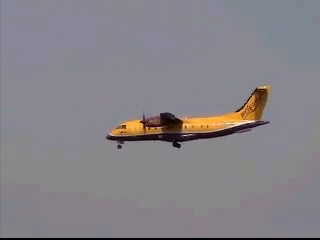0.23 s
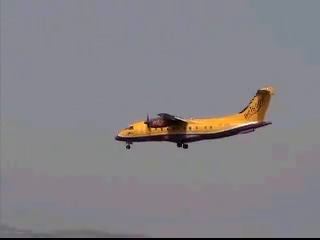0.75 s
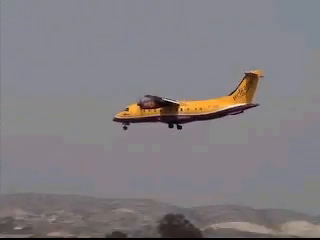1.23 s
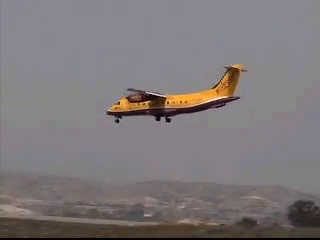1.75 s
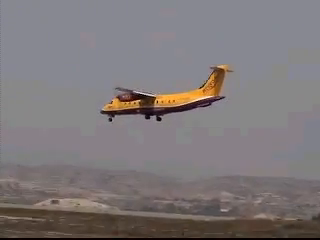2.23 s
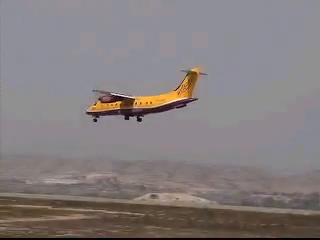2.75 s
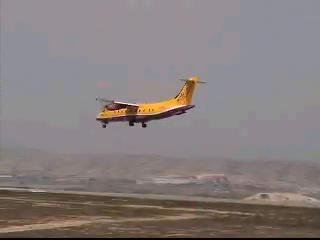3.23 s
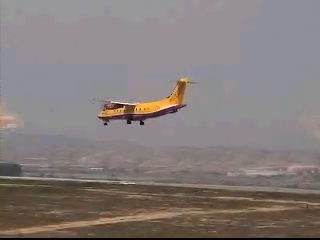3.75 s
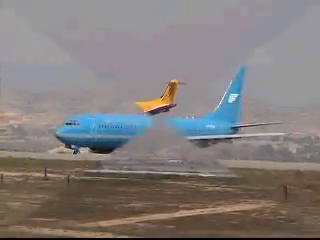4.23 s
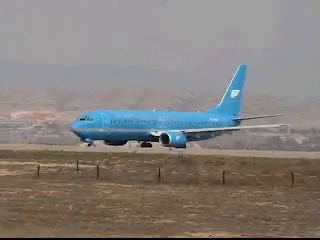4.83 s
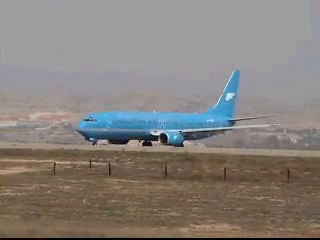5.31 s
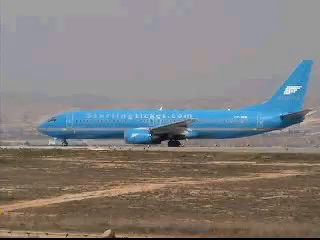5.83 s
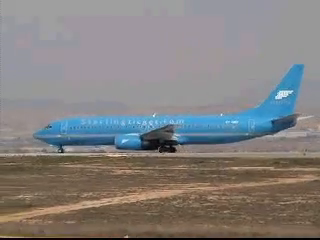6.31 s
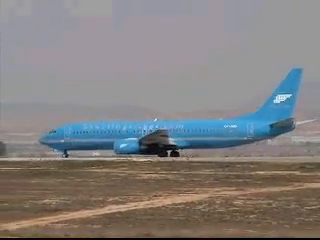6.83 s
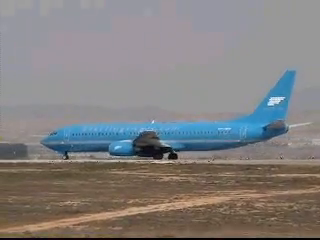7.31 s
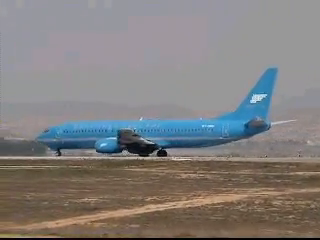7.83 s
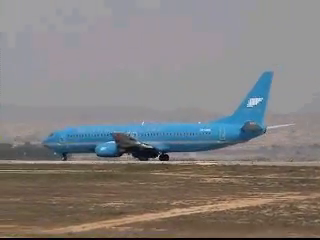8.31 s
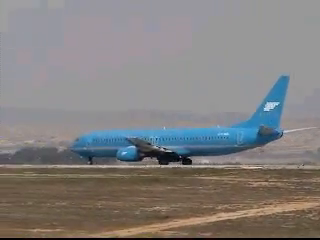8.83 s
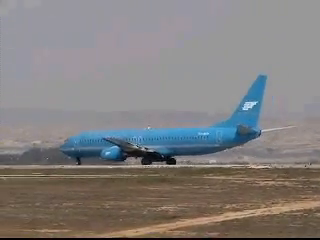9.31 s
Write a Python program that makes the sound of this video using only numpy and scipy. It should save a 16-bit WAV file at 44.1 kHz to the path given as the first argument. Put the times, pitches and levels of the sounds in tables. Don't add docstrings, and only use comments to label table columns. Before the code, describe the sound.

A twin propeller plane drones past on approach with throbbing low hum and hiss, then a distant jet roars steadily while wind gusts thump the microphone.

```python
import sys
import numpy as np
from scipy import signal
from scipy.fft import rfft, irfft, next_fast_len
from scipy.io import wavfile
from scipy.ndimage import uniform_filter1d, map_coordinates

SR = 44100
rng = np.random.default_rng(int(sys.argv[2]) if len(sys.argv) > 2 else 0)


def voltage_ratio(level):
    return 10 ** (np.asarray(level, float) / 20)


def dump(signal):
    limited = np.clip(np.atleast_2d(signal).T, -1, 1)
    pcm = np.round(limited * 32767).astype(np.int16)
    wavfile.write(sys.argv[1], SR, pcm)


N = 422037
T = np.arange(N) / SR
HOP = 256

# centre_s, lift_db, half_length_s
GUSTS = [
    (4.55, 6, 0.081),
    (5.05, -5, 0.086),
    (5.57, 7.5, 0.063),
    (6.0, 13.5, 0.17),
    (6.33, 8, 0.15),
    (7.05, 3, 0.16),
    (8.2, 6, 0.54),
    (9.0, 3, .15),
]
# frequency_hz, density_db
BUFFET_SPECTRUM = [(20, -27), (50, -1.5), (110, -5), (200, -6.5), (400, -31), (800, -42.5)]
# centre_s, peak_db, pitch_hz
THUMPS = [(4.438, -37, 180.6), (4.461, -31, 122), (4.516, -21, 145), (4.659, -18.5, 142), (5.567, -21, 95),
          (5.87, -26, 141), (5.924, -14, 88), (5.979, -18, 156), (6.027, -10, 120), (6.082, -18, 124),
          (6.136, -26, 103), (6.164, -18, 107), (6.194, -16, 97), (6.285, -15.5, 94), (6.34, -16, 81.4),
          (6.398, -13, 146), (7.877, -20, 147), (7.936, -16, 117), (8.318, -13.5, 142), (8.482, -18, 111),
          (8.804, -20, 127), (8.89, -21, 130)]
# centre_s, peak_db, pitch_hz
KNOCK = (6.172, -16, 360)

# frequency_hz, density_db
JET_SPECTRUM = [(15, -44), (25, -20), (102, 5), (130, -17.5), (172, 0.5), (209, -5.5), (309, -1.5),
                (447, -9), (487, -9.5), (838, -4.5), (1350, -15), (2080, -15.5), (2430, -12.5),
                (2880, -16.5), (4450, -19), (5780, -50), (9790, -120)]
JET_PARTS_HZ = (666, 2740)
# multiple, width_hz, level_db
FAN_SKIRTS = [
    (1, 51, -46.5),
    (2, 110, -47),
    (3, 200, -50.5),
    (4, 120, -51),
]
# pitch_hz, level_db
SHAFT_LINES = [(190, -56), (1720, -61), (2090, -64), (2728, -63), (3138, -64), (3565, -64)]
# centre_s, lift_db, half_length_s
FAN_SWELLS = [
    [(5.3, 2, 0.25), (6.3, 7.5, 0.44), (7.0, 7, .15), (7.35, 9.5, .12), (7.95, -1, .12), (8.5, 4, 0.21)],
    [(5.1, 5, 0.22), (5.8, 14, 0.11), (6.3, 12.5, 0.17), (6.65, 8.5, 0.096), (6.92, 10, 0.11), (9.0, 4, 0.18)],
    [(5.3, 0, .2), (7.2, 16, 0.17), (8.6, 13, 0.18)],
]
# start_s, end_s
JET_FADE_S = (3.9, 4.7)

# time_s, engine_level_db, abeam_ratio (how far the propeller side faces the listener)
APPROACH = [(0, -20, 0.45), (.5, -22.5, 0.15), (.85, -19.5, 0.3), (1.2, -16, 0), (1.55, -17.5, -.1),
            (1.85, -22.5, .8), (2.35, -20.5, 0.75), (2.62, -23.5, 0.93), (2.8, -20.5, 0.6),
            (3.05, -20.5, .7), (3.3, -20.5, .8), (3.5, -18.5, 0.1), (3.75, -21.5, 0.86), (4.0, -23.5, -.1),
            (4.3, -24.5, 0.2), (4.46, -28, .2), (4.62, -40, 0.57), (5.0, -41, 0.4)]
APPROACH_PARTS_HZ = (75, 300, 530, 850, 2400)
# frequency_hz, density_db
WASH_SPECTRUM = [(15, -62), (25, -54), (66, -6), (102, 0.5), (131, -4), (146, -2), (172, -11), (260, 0),
                 (508, -9.5), (671, -5.5), (962, -1.5), (1170, -15.5), (1250, -14.5), (1620, -31),
                 (2750, -120)]
# frequency_hz, density_db
HISS_SPECTRUM = [(740, -36), (1250, -6), (1560, 0.5), (2050, -7), (2430, 3.5), (2700, -2.5), (2970, 5),
                 (3340, -2), (3730, 1.5), (4450, -1), (5780, -36), (9790, -120)]
# time_s, pitch_hz
BLADE_PITCH = [(0, 142), (1, 140.3), (2, 138), (3, 131), (3.6, 126.5), (4.2, 125), (5, 118.8)]
# time_s, level_db
DRONE = [(0, -34), (.4, -33), (1.3, -23), (1.6, -30.5), (1.9, -20), (2.6, -21.5), (2.92, -26.5),
         (3.25, -20.5), (3.47, -31), (3.62, -20), (3.9, -27.5), (4.5, -31), (5, -51)]
# time_s, beat_hz
BEAT = [(0, 4.7), (1.7, 5.0), (2.2, 5.7), (5, 6.05)]
# centre_s, lift_db, half_length_s
OVERTONES = [
    (.73, 16, .06),
    (1.35, 11.5, 0.34),
    (2.1, 11.5, 0.33),
    (2.75, 14.5, .3),
    (3.3, 15, .15),
    (3.7, 15.5, 0.13),
]
# time_s, level_db
HOWL = [(3.05, -62), (3.15, -27), (3.3, -28.5), (3.45, -35), (3.55, -33.5), (3.75, -26.5), (3.9, -45)]
# centre_s, lift_db, half_length_s
HISS_SURGES = [(.01, 1.5, .05), (.72, 5, 0.065), (1.08, 4, 0.073), (1.3, 2, 0.065), (1.5, 3, 0.053),
               (1.68, 6, 0.081), (2.02, 3, 0.059), (2.41, 4.5, 0.063), (2.76, 5.5, 0.13), (3.0, 4, 0.069),
               (3.4, 4.5, 0.1), (3.95, 6, 0.15), (4.3, 1, .1), (4.78, 6, 0.067)]

# frequency_hz, gain_db
LOWPASS = [(4430, 0), (4560, -6), (4680, -30), (4800, -80)]
CARRIER_HZ = (4307.1, 7780.8, 7808.4, 12088, 12115.7)
CARRIER_DB = (-28.5, -37, -27, -17.5, -49)
# frequency_hz, gain_db
COPY_TILT = [(30, -45), (300, -5), (1000, 0), (4500, 10.5)]
# frequency_hz, gain_db
COPY_SPECTRUM = [(4500, -37), (4750, 2), (5050, -1), (5400, 0), (5900, 3.5), (6500, 1), (7300, -5.5),
                 (7700, -4.5), (9000, -5), (10500, -4.5), (11800, -6), (12800, 3)]
# frequency_hz, threshold_db
GATE_THRESHOLD = [(4620, -60), (4700, 8.5), (5050, 8.5), (5300, 5.5), (5700, 7.5), (6300, 7), (6900, 1),
                  (7600, -12), (11500, -9), (12300, 3)]


def colour(points, hz):
    p = np.array(points, float)
    return np.interp(np.log(np.maximum(hz, 1)), np.log(p[:, 0]), p[:, 1])


def columns(table, t):
    s, *rest = np.transpose(table)
    return [np.interp(t, s, c) for c in rest]


def swells(events):
    return sum(db * np.exp(-((T - s) / half) ** 2) for s, db, half in events)


def walk(rate, t=T, count=1):
    knots = rng.standard_normal((count, int(rate * T[-1]) + 3))
    return np.array([map_coordinates(k, [rate * t], order=2, mode="nearest") for k in knots])


def shape(x, points):
    size = next_fast_len(N + 8192)
    gain = voltage_ratio(colour(points, np.fft.rfftfreq(size, 1 / SR)))
    return irfft(rfft(x, size) * gain, size)[:N]


def roar(points, parts_db, parts_hz, flutter_db, patchy_db, rate):
    hz, t, z = signal.stft(rng.standard_normal(N), SR, nperseg=4 * HOP, noverlap=3 * HOP)
    share = np.array([colour(list(zip(parts_hz, row)), hz) for row in np.eye(len(parts_hz))])
    swell = share.T @ np.array([np.interp(t, T, db) for db in parts_db])
    flutter = np.clip(hz / 3000, .1, 1)[:, None] * walk(rate, t)
    patch_index = np.minimum(np.sqrt(hz / 9), 23).astype(int)
    patches = walk(rate / 2, t, count=24)[patch_index]
    db = colour(points, hz)[:, None] + swell + flutter_db * flutter + patchy_db * patches
    return signal.istft(z * voltage_ratio(db), SR, nperseg=4 * HOP, noverlap=3 * HOP)[1][:N]


def tone(hz, db, smear, rate, steady=1):
    a, b = walk(rate, count=2)
    smear = np.clip(smear, 0, 1)
    path = np.sqrt(1 - smear) * steady + np.sqrt(smear / 2) * (a + 1j * b)
    phase = 2 * np.pi * np.cumsum(hz + 0 * T) / SR
    return voltage_ratio(db) * np.sqrt(2) * np.real(path * np.exp(1j * phase))


def wind():
    breeze_db = -35.5 + swells(GUSTS)
    low = shape(voltage_ratio(3.1 * walk(40)[0]) * rng.standard_normal(N), BUFFET_SPECTRUM)
    out = low / low.std() * voltage_ratio(breeze_db - 1.5) * np.clip((T - 4.2) / .2, 0, 1)
    t = np.arange(-2048, 2048) / SR
    for (s, peak_db, hz), turn in zip([*THUMPS, KNOCK], rng.random(len(THUMPS) + 1)):
        i = int(s * SR)
        bell = np.exp(-(t * hz / .65) ** 2)
        out[i - 2048:i + 2048] += voltage_ratio(peak_db - 1) * bell * np.cos(2 * np.pi * (hz * t + turn))
    return out


def jet():
    fan_hz, whine_hz = 838.5, 4338
    fan_db = [db + swells(rows) for db, rows in zip((-43, -52, -53), FAN_SWELLS)]
    rolled_s = T - 7
    sink_db = np.outer((0.03, -.3), rolled_s)
    out = voltage_ratio(-12.5) * roar(JET_SPECTRUM[:-2], sink_db, JET_PARTS_HZ, flutter_db=1.0, patchy_db=1.03, rate=16)
    out += tone(fan_hz, fan_db[0], .6, 30)
    out += tone(2 * fan_hz, fan_db[1], .85, 45)
    out += tone(3 * fan_hz, fan_db[2], .98, 260)
    out += tone(whine_hz, -48 - 1.24 * (rolled_s + 2), .45, 24)
    out += sum(tone(k * fan_hz, db, 1.0, width) for k, width, db in FAN_SKIRTS)
    out += sum(tone(hz, db, 0.26, 3) for hz, db in SHAFT_LINES)
    start_s, end_s = JET_FADE_S
    return out * np.clip((T - start_s) / (end_s - start_s), 0, 1)


def propellers():
    (hz,), (drone_db,), (beat_hz,) = (columns(c, T) for c in (BLADE_PITCH, DRONE, BEAT))
    turns = np.cumsum(beat_hz) / SR
    beat_turns = turns - np.interp(0.26, T, turns)
    far = voltage_ratio(-35 - drone_db) * np.exp(2j * np.pi * beat_turns)
    octave_db = -42.5 + swells(OVERTONES)
    drone = tone(hz, drone_db, .08, 14, 1 + far)
    return drone + tone(2 * hz, octave_db, .25, 16) + tone(3 * hz, octave_db - 3, .35, 20)


def airframe_howl():
    (howl_db,) = columns(HOWL, T)
    return tone(671, howl_db + 1, .4, 24)


def wash_and_hiss():
    spectrum = WASH_SPECTRUM[:-2] + [(f, db - 10.5) for f, db in HISS_SPECTRUM[2:-2]]
    level_db, abeam = columns(APPROACH, T)
    follow = (0.51, 1.03, 0.9, 1.05, 0.7)
    abeam_db = (3, 7, -0.5, .1, 1.5)
    parts = np.outer(follow, level_db + 22) + np.outer(abeam_db, abeam - .5)
    parts[4] += swells(HISS_SURGES) - 1.5
    return voltage_ratio(-2.0) * roar(spectrum, parts, APPROACH_PARTS_HZ, flutter_db=1.7, patchy_db=1.7, rate=12)


def turboprop():
    return (propellers() + airframe_howl() + wash_and_hiss()) * np.clip((5.1 - T) / 0.44, 0, 1)


def scene():
    return (turboprop() + jet() + wind())[None]


def dropouts(x):
    rate_hz, length_s = 9, .009
    size = int(length_s * SR)
    lost = np.repeat(rng.random(N // size + 1) < rate_hz * length_s, size)[:N]
    top_band = shape(x, [(4080, -40), (4200, 0)])
    return x - uniform_filter1d(1. * lost, size // 4) * top_band


def rate_change_copies(x):
    carriers = sum(voltage_ratio(db) * np.cos(2 * np.pi * hz * T) for hz, db in zip(CARRIER_HZ, CARRIER_DB))
    carriers += voltage_ratio(-35.5) * rng.standard_normal(N)
    return shape(shape(x, COPY_TILT) * carriers, COPY_SPECTRUM)


def gate(x, budget_db=1.4, strain=.22):
    size = dict(fs=SR, window="hann", nperseg=4096, noverlap=2048)
    hz, t, z = signal.stft(np.pad(x, (0, 8192), "reflect"), boundary="even", **size)
    weak = np.abs(z * (hz > 4680)[:, None])
    around = uniform_filter1d(uniform_filter1d(weak, 31, axis=0), 5, axis=1)
    loud = np.abs(z[(hz > 2000) & (hz < 4400)]).mean(axis=0)
    strained = ((hz > 5150) & (hz < 9000))[:, None]
    busy = (loud / np.percentile(loud, 80)) ** (strain * strained)
    limit = around * busy * voltage_ratio(colour(GATE_THRESHOLD, hz)[:, None] + budget_db * walk(9, t))
    return signal.istft(z * (np.abs(z) > limit), **size)[1][:N]


def top_cut(x):
    return signal.sosfilt(signal.butter(12, 12710, fs=SR, output="sos"), x)


def record(dry):
    x = dropouts(shape(np.tanh(dry[0]), LOWPASS))
    mix = gate(x + rate_change_copies(x))[None]
    return top_cut(mix)


dry = scene()
out = record(dry)
dump(out)
```